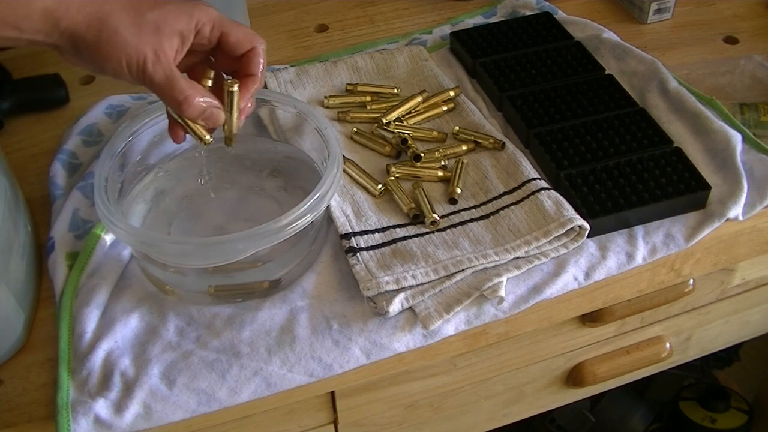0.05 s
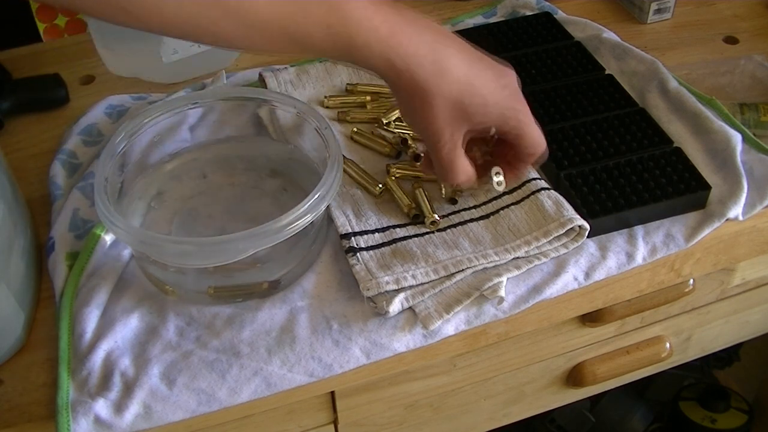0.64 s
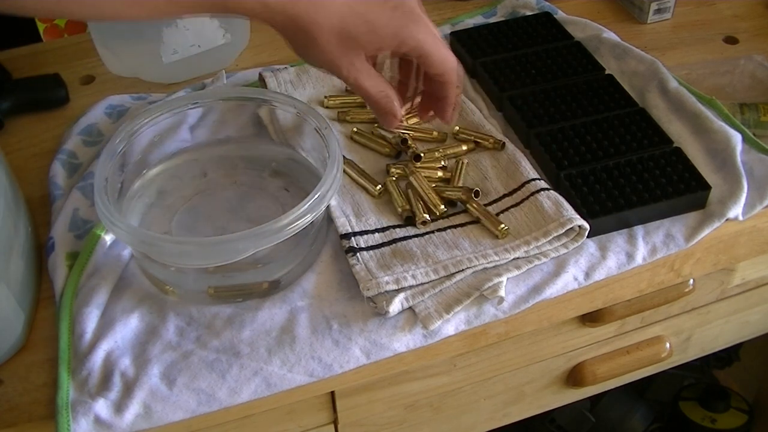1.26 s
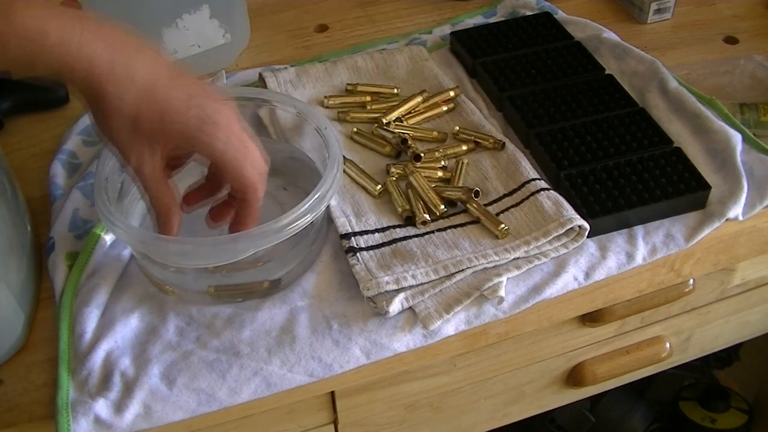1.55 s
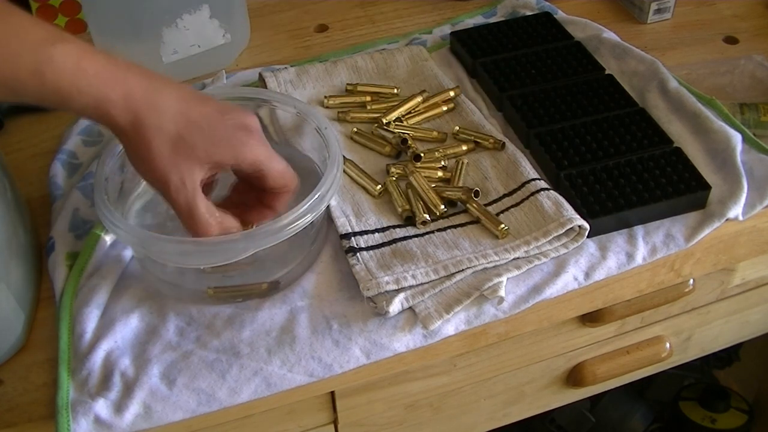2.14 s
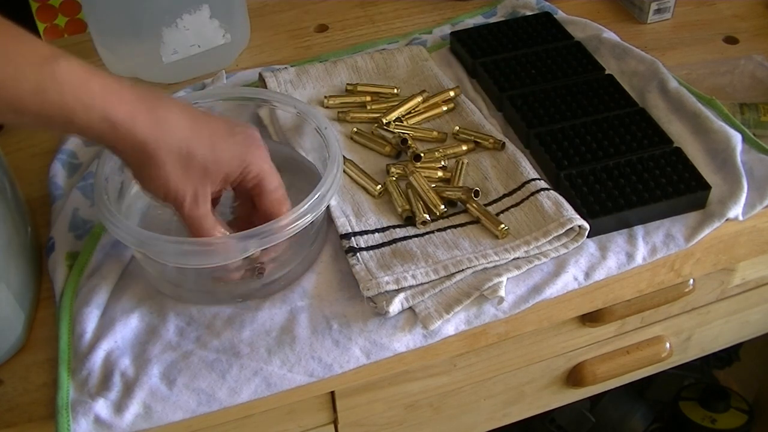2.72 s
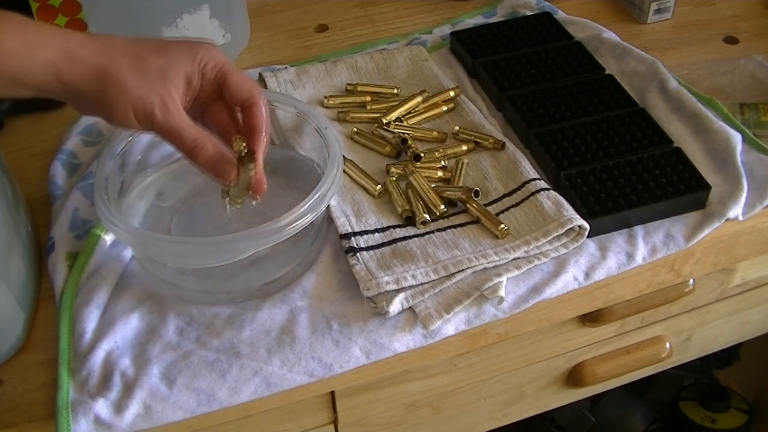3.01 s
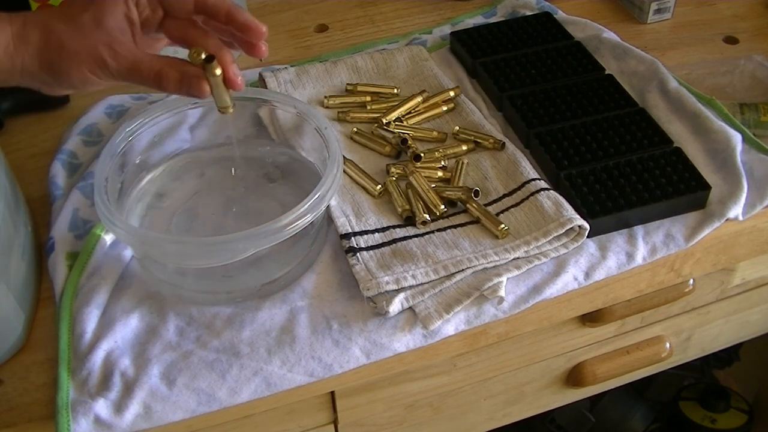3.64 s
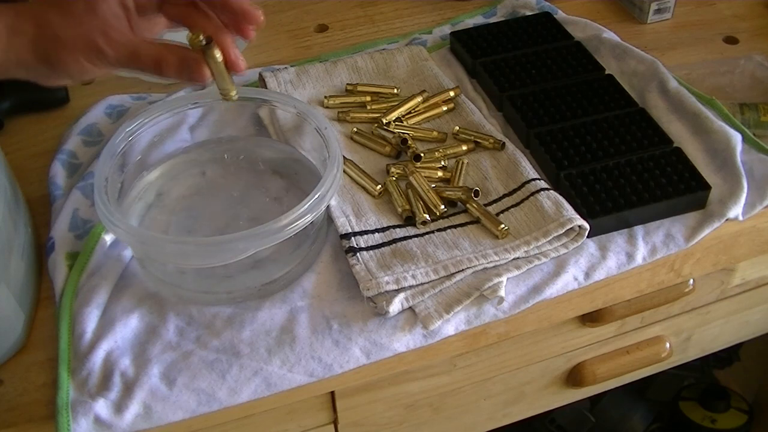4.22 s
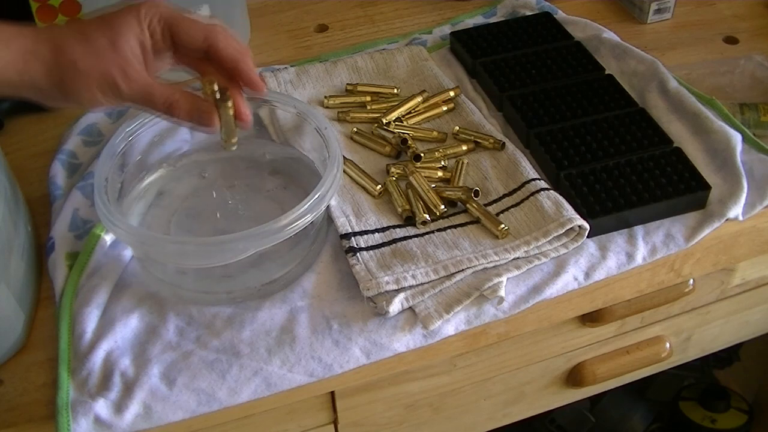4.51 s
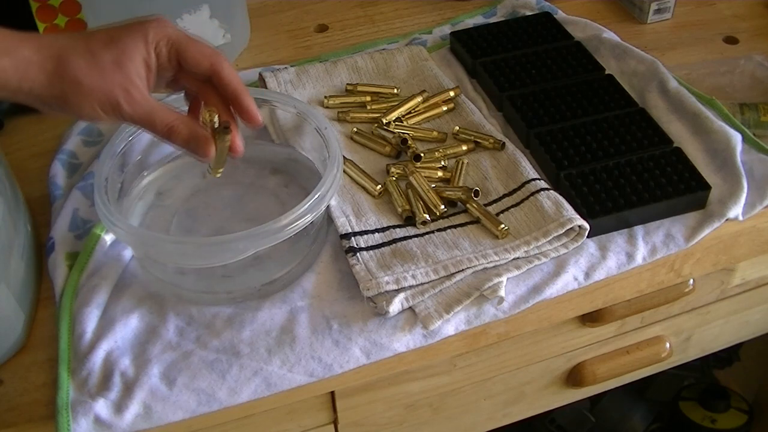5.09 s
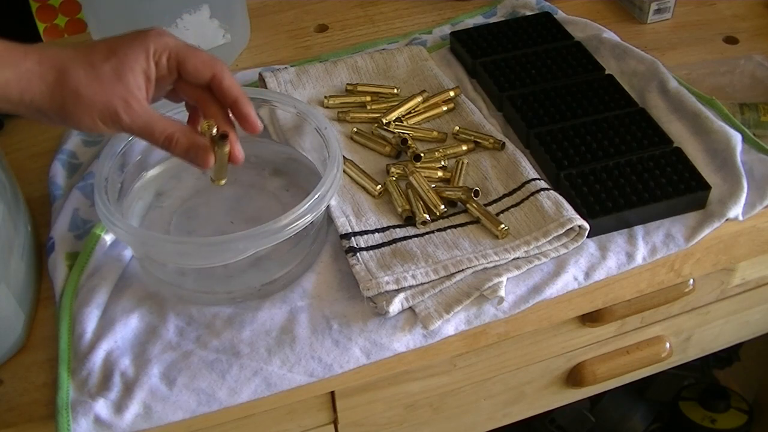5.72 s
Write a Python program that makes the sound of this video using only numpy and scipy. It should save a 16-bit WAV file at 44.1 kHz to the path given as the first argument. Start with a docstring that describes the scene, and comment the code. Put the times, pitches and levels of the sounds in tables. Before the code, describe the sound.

A faint, steady electrical hum and hiss fill a small room, and everything is heard up close. From about 0.7 to 1 second, wet brass cartridge cases click against each other on a pile in a quick cluster, with thin high rings and slight scraping. A hand softly bumps the towel-covered table at 1.2 seconds. Near 1.9 seconds comes the loudest sound, a dull knock of a case against a plastic bowl of water. More underwater thuds, light scrapes and a few bubbles follow between 2.3 and 2.7 seconds. Around 2.9 seconds a case is lifted out with a brief, high, rising ring and a flurry of tiny plinks. Scattered drops fall back into the bowl from 3.2 to about 5 seconds, with a very faint rising tone near 4.7. After that only the hum and hiss remain.

```python
"""A small room, close up: wet brass cartridge cases click and ring as they are laid on a pile on a towel.
The hand goes into a plastic bowl of water, knocks cases against its bottom with dull thuds and lifts
one out. Its ring glides up as it drains, and drops plink back into the bowl as trapped bubbles.
Underneath, electrical gear hums and hisses."""
import sys
import numpy as np
from scipy import signal
from scipy.fft import irfft
from scipy.io import wavfile
from scipy.ndimage import uniform_filter1d

SR = 44100
rng = np.random.default_rng(int(sys.argv[2]) if len(sys.argv) > 2 else 0)


def put_to_file(sound):
    """Save the sound as 16-bit audio at rate SR, in the file named by the first command-line argument."""
    columns = np.atleast_2d(sound).T  # one column per channel
    safe = np.clip(columns, -1, 1)
    whole_steps = np.round(safe * 32767)
    wavfile.write(sys.argv[1], SR, whole_steps.astype(np.int16))


N = 254016
RING_T = np.arange(SR // 3) / SR  # time axis of one hit

# brass-on-brass hits: start_s, level_db, looseness (0 gripped, 1 lying free)
CLINKS = [(.665, -30, 0.73), (0.6955, -22.5, 0.14), (.701, -24.5, .1), (0.7424, -19.5, .85),
          (.7657, -28, 0.92), (.7795, -29, 0.65), (0.7855, -30, 0.41), (0.7936, -29, 0.81),
          (0.812, -29.5, 0.84), (0.878, -30, .45), (0.9567, -28, .3), (0.9653, -32, .5),
          (1.0058, -28, 0.13), (1.0244, -30, 0.27)]
# thin ring of an empty case's wall: pitch_hz, level_db, t60_s
CASE_MODES = [(8700, -3, .19), (8745, -8, .09), (11785, 0, .13), (11700, -7, .1), (14410, -11, .11)]
# dead click of a case held in the fingers: pitch_hz, level_db, t60_s
CLICK_MODES = [(1894, -13, 0.025), (3060, -6.5, 0.0056), (4290, -0.5, 0.0039), (4980, -6.5, 0.0069),
               (5600, -5.5, 0.003)]
# tuning of the case being touched: start_s, pitch_ratio
CASE_TUNING = [(0, 1.0), (.95, 1.029), (1.0, 1.013)]
# cases hitting the bowl: start_s, level_db, hardness_db_per_octave, pitch_ratio, relative_ring_db
KNOCKS = [(1.8637, -26, 0, .96, -12), (1.885, -4, 1, .98, -13.5), (2.2837, -20.5, 10.5, 1.38, -30),
          (2.2852, -11.5, 5, 1.02, -33), (2.333, -20.5, 8, 0.89, -30), (2.3409, -12.5, -1.5, 1.02, -35),
          (2.4443, -13, -2.5, 0.98, -10.5), (2.541, -23, 1, 1.2, -19), (2.5546, -9.5, 0, 0.89, -15.5),
          (2.557, -9, -4, .94, -29), (2.658, -17.5, -4, 1.3, -24)]
# damped thud of plastic under water: pitch_hz, level_db, t60_s
THUD_MODES = [(790, -20.5, 0.034), (1120, -27, 0.018), (1445, 3.5, 0.0074), (1813, -14, 0.023),
              (1935, -3.5, 0.012), (2250, -23, 0.052), (3090, -13.5, 0.015), (3327, -14.5, 0.014),
              (4400, -42, .012)]
# lasting ring of the filled bowl: pitch_hz, level_db, t60_s
BOWL_MODES = [(965, -15, .17), (1110, -10, .12), (1280, -10, .09), (1368, 0, .085), (1540, -16, .06)]
# soft bumps of the hand on the towel: start_s, level_db
BUMPS = [(1.2421, -34), (1.2485, -37)]
# table top under the towel: pitch_hz, level_db, t60_s
TABLE_MODES = [(544, 0, 0.038), (850, 2, 0.05)]
# cases scraping on the pile, later in the bowl: start_s, end_s, level_db
SLIDES = [(.698, 0.716, -34), (0.715, 0.731, -43), (.749, 0.85, -47.5), (0.962, 0.992, -45.5),
          (1.007, 1.039, -42), (2.346, 2.405, -48), (2.395, 2.428, -38.5), (2.513, 2.553, -42),
          (2.62, 2.639, -43), (2.66, 2.685, -40)]
# rising glides of draining cases: start_s, length_s, level_db, from_hz, to_hz
DRAINS = [(2.302, 0.33, -52.5, 6050, 6850), (2.848, 0.11, -29, 5860, 6920), (4.55, .34, -54, 6050, 6650)]
# partials of a wet case: pitch_ratio, level_db
WET_PARTIALS = [(1.001, -1.5), (1.428, -22), (1.87, -26)]
# bubbles knocked out of sunken cases or trapped by drops: start_s, level_db, pitch_hz, t60_s
BUBBLES = [(2.288, -21, 1358, 0.064), (2.5551, -23, 1850, .033), (2.658, -34.5, 1850, 0.071),
           (2.849, -28.5, 4870, 0.0065), (2.8593, -21.5, 3470, 0.0086), (2.8807, -22.5, 5700, .016),
           (2.8962, -36, 4050, .02), (2.91, -33.5, 3260, .038), (2.921, -34, 2160, 0.087),
           (3.168, -36.5, 4000, .035), (3.1845, -40, 4500, .03), (3.566, -34, 1505, 0.052),
           (3.7157, -28, 2770, .034), (3.7751, -31, 2400, .014), (3.807, -31.5, 4930, .007),
           (3.808, -31.5, 3310, 0.02), (4.469, -33.5, 4350, .009), (4.83, -29.5, 2600, 0.028)]
# reverb decay: frequency_hz, t60_s
ROOM_DECAY = [(300, 0.5), (1200, 0.27), (3500, 0.19), (12000, 0.089)]
# EQ curve of the room tone: frequency_hz, gain_db
ROOM_TONE_EQ = [(59, -68), (100, -47), (150, -47), (194, -23), (244, -23), (271, -16), (361, -12),
                (384, -17), (426, -9.5), (632, -7.5), (724, -3), (1120, -5), (1300, -4), (1850, -6.5),
                (3700, -15.5), (4810, -49), (8140, -120)]
# EQ curve of the electrical hiss: frequency_hz, gain_db
HISS_EQ = [(2180, -43), (3700, -30), (3980, -1.5), (4100, -2), (4360, -3), (4440, -3), (6160, 0.5),
           (7440, 1), (8200, -4), (8660, -0.5), (9430, -5.5), (11000, -3.5), (12500, -10), (15100, -16),
           (15800, -20)]
# hum and whine of the gear: pitch_hz, width_hz, level_db
HUM_BANDS = [(281.4, 5.7, -73), (363, 1.6, -83.5), (480, 2, -89), (596, 4.3, -67.5), (732, 1.55, -63),
             (840, 1.8, -70.5), (1497, 43, -64), (4215, 50, -65.5), (5030, 80, -70), (6050, 290, -65),
             (10200, 80, -74)]
# mains throb on the background: frequency_hz, depth_fraction
THROB_DEPTH = [(2500, 0.046), (5000, .11), (8000, 0.32), (11500, 0.36), (15000, .16)]
# how alike the background is left and right: frequency_hz, correlation
STEREO_LIKENESS = [(60, .1), (130, .4), (200, 0.99), (400, .97), (1400, .97), (2800, 0.95), (4500, 1),
                   (6500, 1), (8000, 0.98), (11000, 0.93), (13500, 1)]
# pan of the background: frequency_hz, left_minus_right_db
STEREO_BALANCE = [(60, 1), (180, -2), (550, -1.5), (1200, -.8), (2500, 0.5), (5000, 0), (9000, 0.9),
                  (14000, 1.3)]


def clinks(detune=0.0035):
    """Brass hits brass: a dead click and a thin wall ring. A looser case clicks higher, rings louder."""
    out = np.zeros(N)
    since_s, tunings = np.transpose(CASE_TUNING)
    for start, db, looseness in CLINKS:
        pitch = tunings[np.searchsorted(since_s, start) - 1] * (1 + detune * rng.uniform(-1, 1))
        ring_db = np.interp(looseness, [0, 1], [-31, -14.5])
        click_pitch = np.interp(looseness, [0, 1], [0.784, 1.12])
        click = ring(vary_strike(CLICK_MODES, spread_db=0.5), click_pitch, contact_s=0.00006)
        wall = ring(vary_strike(CASE_MODES, spread_db=1.9), pitch)
        add(out, start, amp(db) * muffle(click))
        add(out, start, amp(db + ring_db) * rattle(wall))
    return out


def ring(modes, pitch=1, tilt_db=0, contact_s=0.0001):
    """A struck body's modes die away; a long contact softens the attack, tilt per octave brightens it."""
    hz, db, t60 = np.transpose(modes)[:, :, None]
    db = db + tilt_db * np.log2(hz / hz[np.argmax(db)])
    partials = amp(db - 60 * RING_T / t60) * np.sin(2 * np.pi * hz * pitch * RING_T)
    return partials.sum(0) * (1 - np.exp(-RING_T / contact_s))


def vary_strike(modes, spread_db):
    """Each point of contact shares the blow differently among the modes."""
    return np.array(modes) + np.outer(spread_db * rng.standard_normal(len(modes)), [0, 1, 0])


def rattle(x, depth=0.31, smooth_samples=130):
    """A ringing case keeps touching its neighbours, so its tail flutters."""
    flutter = unit(uniform_filter1d(rng.standard_normal(len(x)), smooth_samples))
    return x * (1 + depth * flutter) / np.sqrt(1 + depth ** 2)


def rub(start_s=1.005, length_s=0.048, level_db=-33, pitch_hz=8812):
    """One case drags along another and holds its note for the length of the stroke."""
    envelope = amp(level_db) * fade(length_s, attack_s=0.0059, release_s=0.012)
    partials = [(1, -3.5), (1.36, -20), (1.64, -26)]  # pitch_ratio, level_db
    return singing_wall(start_s, envelope, pitch_hz, partials, roughness=0.43, flutter_hz=120)


def singing_wall(start, envelope, hz, partials, roughness, flutter_hz):
    """Many tiny contacts keep a case wall ringing with a grainy tone."""
    out = np.zeros(N)
    cycles = np.cumsum(hz * np.ones(len(envelope))) / SR
    lowpass = signal.butter(2, flutter_hz, fs=SR, output="sos")
    for ratio, db in partials:
        slow_noise = unit(signal.sosfilt(lowpass, rng.standard_normal((2, SR))))
        flutter = roughness * slow_noise[:, :len(envelope)]
        phase = 2 * np.pi * ratio * cycles
        tone = (1 + flutter[0]) * np.sin(phase) + flutter[1] * np.cos(phase)
        add(out, start, envelope * amp(db) * tone)
    return out / np.sqrt(1 + roughness ** 2)


def knocks(flex_s=0.00058):
    """Cases hit the plastic under water: a tick, then a thud and a ring as the bowl flexes."""
    out = np.zeros(N)
    give = 1 - np.exp(-(RING_T / flex_s) ** 2)  # water makes the plastic yield gradually
    for start, db, hardness, pitch, ring_db in KNOCKS:
        thud = ring(vary_strike(THUD_MODES, spread_db=1.5), pitch, hardness, contact_s=0.00064)
        tail = amp(ring_db) * ring(BOWL_MODES, contact_s=0.00048)
        tick = muffle(ring(CLICK_MODES, pitch, contact_s=0.00017), top_hz=6000 * pitch)
        tick_db = -16.5 + 1.83 * hardness  # harder hits tick louder
        add(out, start, amp(db) * (give * (thud + tail) + amp(tick_db) * tick))
    return out


def bumps():
    """The hand bumps the table top, cushioned by the towel."""
    out = np.zeros(N)
    for start, db in BUMPS:
        add(out, start, amp(db) * ring(TABLE_MODES, contact_s=0.0012))
    return out


def slides(slips_per_s=2200, in_bowl_from_s=1.6):
    """Sliding brass sticks and slips: a scrape of tiny hits on other cases or on the bowl under water."""
    out = np.zeros(N)
    on_pile = muffle(ring(CLICK_MODES) + amp(-3) * ring(CLICK_MODES, pitch=0.707), top_hz=6940)
    plastic = ring(THUD_MODES, tilt_db=3, contact_s=0.00016)
    in_bowl = muffle(plastic + amp(-18) * ring(CLICK_MODES, pitch=0.73), top_hz=4300)
    for start, end, db in SLIDES:
        stroke = fade(end - start, attack_s=0.003, release_s=0.008)
        slipping = rng.random(N) < slips_per_s / SR
        strength = rng.uniform(-1.77, 1.82, N)
        slips = stroke * (strength * slipping)[:len(stroke)]
        surface = in_bowl if start > in_bowl_from_s else on_pile
        add(out, start, amp(db) * signal.fftconvolve(slips, surface))
    return out


def drain(start, length_s, db, from_hz, to_hz):
    """Water runs out of a case: its ring glides up while it swells and fades."""
    progress = np.arange(0, length_s, 1 / SR) / length_s
    swell_db = np.interp(progress, [0, 0.47, 1], [-22, 0, -28])
    glide_hz = from_hz + (to_hz - from_hz) * progress
    return singing_wall(start, amp(db + swell_db), glide_hz, WET_PARTIALS, roughness=0.65, flutter_hz=157)


def drops(splash_db=-4, attack_s=0.00014, rise_octaves=0.15):
    """Each plink is a tiny splash and a trapped bubble that rings and bends upward."""
    out = np.zeros(N)
    for start, db, hz, t60 in BUBBLES + drips():
        glide_hz = hz * 2 ** (rise_octaves * np.minimum(RING_T / t60, 1))
        envelope = amp(-60 * RING_T / t60) * (1 - np.exp(-RING_T / attack_s))
        bubble = envelope * np.sin(2 * np.pi * np.cumsum(glide_hz) / SR)
        splash = ring(CLICK_MODES, pitch=np.sqrt(hz / 4330))  # smaller drops splash higher
        add(out, start, amp(db) * (bubble + amp(splash_db) * splash))
    return out


def drips(span_s=(3.2, 5.1), per_s=2, level_db=-47, range_hz=(2200, 5400), t60_s=0.018):
    """Cues for faint drips that fall from the wet hand at random moments."""
    draws = rng.random((round(per_s * np.ptp(span_s)), 2))
    return [(np.interp(when, [0, 1], span_s), level_db, np.interp(pitch, [0, 1], range_hz), t60_s)
            for when, pitch in draws]


def room_reverb(x, predelay_s=0.003, echoes_per_s=3000, width=0.14):
    """Sparse reflections off the table and near walls, the treble dying first."""
    count = SR // 2
    taps = rng.choice([-1., 1.], (2, count))
    taps *= rng.random((2, count)) < echoes_per_s / SR
    taps *= np.arange(count) > predelay_s * SR
    hz, t, spectrum = signal.stft(taps, SR, nperseg=256)
    decay = amp(-60 * t / curve(ROOM_DECAY, hz)[:, None])
    mid, side = signal.istft(spectrum * decay, SR, nperseg=256)[1]
    tails = np.array([mid + width * side, mid - width * side]) / np.linalg.norm(mid)
    return signal.fftconvolve(x[None], tails, axes=1)[:, :N]


def background(room_db=-47.5, hiss_db=-52, rumble_db=-91.5, mains_hz=60):
    """A bed of room tone, rumble, hum and electrical hiss; its top end throbs twice per mains cycle."""
    hz = np.fft.rfftfreq(N, 1 / SR)
    layers = [(room_db, amp(curve(ROOM_TONE_EQ, hz))),
              (hiss_db, amp(curve(HISS_EQ, hz))),
              (rumble_db, 1 / (1 + (hz / 170) ** 4))]
    layers += [(db, 1 / (1 + (2 * (hz - centre) / width) ** 2)) for centre, width, db in HUM_BANDS]
    magnitude = np.sqrt(sum((amp(db) * unit(shape)) ** 2 for db, shape in layers) * N / 2)
    noise = rng.standard_normal((4, len(hz)))
    likeness = curve(STEREO_LIKENESS, hz)
    mid = np.sqrt((1 + likeness) / 2) * (noise[0] + 1j * noise[1])
    side = np.sqrt((1 - likeness) / 2) * (noise[2] + 1j * noise[3])
    pan = amp(curve(STEREO_BALANCE, hz) / 2)
    spectrum = magnitude * np.array([(mid + side) * pan, (mid - side) / pan])
    throb = np.cos(2 * np.pi * 2 * mains_hz * np.arange(N) / SR)
    return irfft(spectrum, N) + throb * irfft(spectrum * curve(THROB_DEPTH, hz), N)


def low_cut(x, corner_hz=380):
    """A steep low cut that thins the bass of the clicks, knocks and drops."""
    highpass = signal.butter(2, corner_hz, btype="high", fs=SR, output="sos")
    return signal.sosfilt(highpass.repeat(2, axis=0), x)


def muffle(x, top_hz=8000):
    """Fingers, water and cloth take the top off a click."""
    return signal.sosfilt(signal.butter(4, top_hz, fs=SR, output="sos"), x)


def fade(length_s, attack_s, release_s):
    """Linear attack, hold and release."""
    t = np.arange(0, length_s, 1 / SR)
    return np.minimum(np.minimum(t / attack_s, (length_s - t) / release_s), 1)


def amp(db):
    """Decibels to gain."""
    return 10 ** (np.asarray(db) / 20)


def unit(x):
    """Scales to rms 1."""
    return x / np.sqrt(np.mean(x ** 2) + 1e-20)


def curve(points, hz):
    """Reads a breakpoint curve on a log-frequency axis."""
    point_hz, value = np.transpose(points)
    return np.interp(np.log(hz + 1), np.log(point_hz + 1), value)


def add(mix, start_s, sound):
    """Mixes a sound in at its cue."""
    part = mix[round(start_s * SR):][:len(sound)]
    part += sound[:len(part)]


def scene():
    """Brass, bowl and water up close, with a short reverb over the background bed."""
    brass = low_cut(clinks() + rub())
    handling = low_cut(knocks() + bumps() + slides(), corner_hz=484)
    water = low_cut(drops() + sum(drain(*row) for row in DRAINS))
    reverb = room_reverb(amp(-11.5) * (brass + handling) + amp(-12) * water)
    slightly_right = amp([[-0.3], [0.3]])
    return brass + handling * slightly_right + water + reverb + background()


def record(dry):
    """A steep high cut at 15.9 kHz."""
    high_cut = signal.firwin(511, 15900, window=("kaiser", 9), fs=SR)
    return signal.oaconvolve(dry, high_cut[None], "same")


dry = scene()
out = record(dry)
put_to_file(out)
```